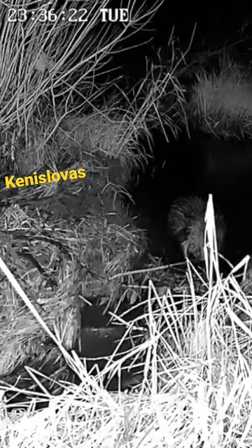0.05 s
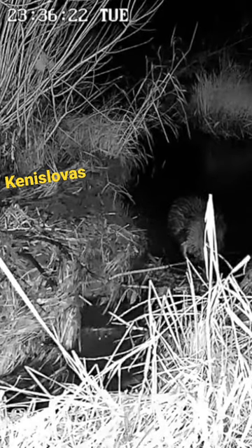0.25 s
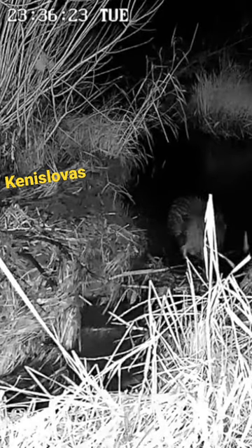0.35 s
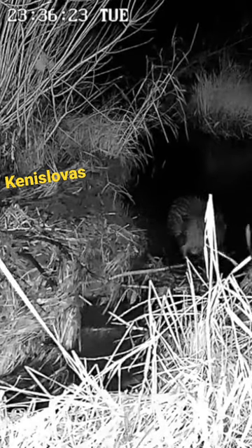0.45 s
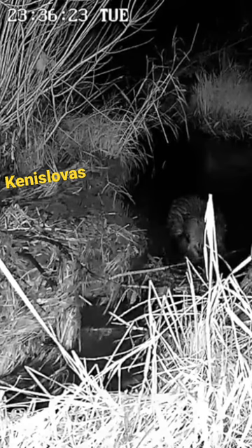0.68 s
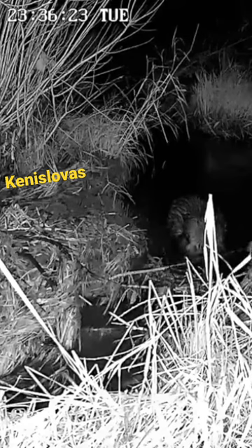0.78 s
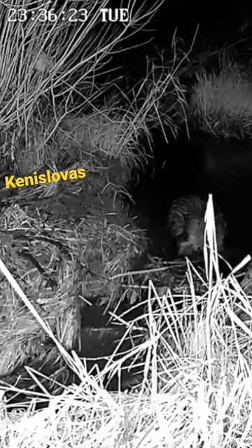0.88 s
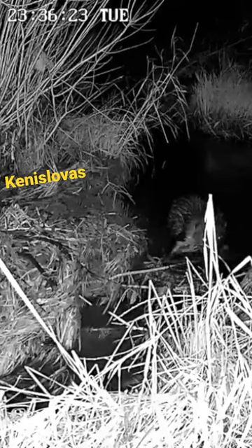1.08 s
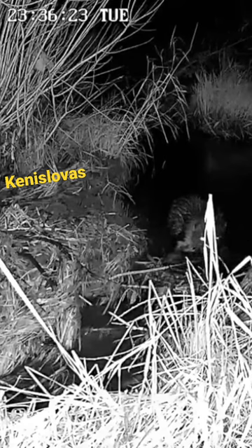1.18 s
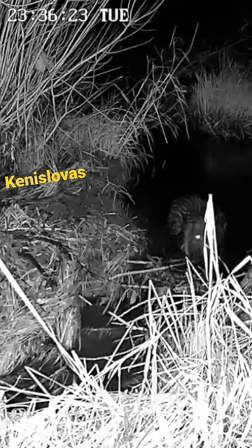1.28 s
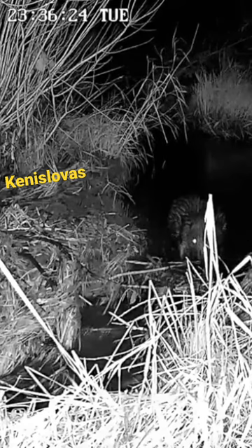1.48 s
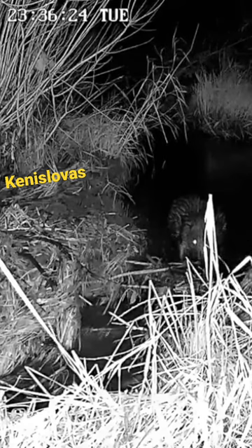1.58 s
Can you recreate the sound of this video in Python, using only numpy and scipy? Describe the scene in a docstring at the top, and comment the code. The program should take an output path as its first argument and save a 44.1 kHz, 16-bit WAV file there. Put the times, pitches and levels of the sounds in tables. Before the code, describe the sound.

A muffled, hollow wash of stream water with small plips runs throughout, heard through a trail camera's closed case. Deep soft thumps start at about 0.2 seconds, are strongest near 0.3 and 1 second, and mostly stop by 1.1. A low rumble throbs underneath. Faint hiss with a thin electronic whine appears at the start, briefly at 0.5, and from 1.3 seconds to the end, around 1.7.

```python
"""Water washes and plips: a stream at night, heard through the closed case of a trail camera on the bank.
The wash is shaped noise and each plip a briefly ringing bubble, coloured by the hollow of the case
near 800 Hz. Deep soft thumps and a slow throb rumble underneath; a faint, flickering hiss and the
camera's thin electronic whine lie on top."""
import sys
import numpy as np
from scipy import signal
from scipy.fft import rfft, irfft
from scipy.io import wavfile

SR = 44100
rng = np.random.default_rng(int(sys.argv[2]) if len(sys.argv) > 2 else 0)


def pcm_store(signal):
    """Save signal as 16-bit PCM."""
    levels = np.round(np.clip(np.atleast_2d(signal), -1, 1) * 32767)
    wavfile.write(sys.argv[1], SR, levels.astype(np.int16).T)


N = 72765

# Level of the hollow wash of water: time_s, level_db
HOLLOW_ENVELOPE = [(0, -50), (.15, -49.5), (.22, -55), (.33, -54.5), (.45, -51.5), (.9, -51), (1.15, -50.5),
                   (1.45, -50.5), (1.56, -45.5), (1.65, -49)]
# Level of the low wash, which drops out briefly during the biggest thumps: time_s, level_db
LOW_ENVELOPE = [(.14, -48), (.18, -54), (.2, -73.5), (.34, -77), (.39, -51.5), (.75, -50.5), (1.3, -51.5),
                (1.65, -51)]
# Levels of two brighter bands, which cut in and out: time_s, level_db
BRIM_ENVELOPE = [(0, -79), (.17, -67), (.21, -85.5), (.33, -82.5), (.37, -66.5), (.5, -57), (.68, -57.5),
                 (.72, -78.5), (.79, -73.5), (.82, -64), (.88, -56), (.91, -79), (.96, -61), (1.25, -59.5),
                 (1.65, -61)]
SWISH_ENVELOPE = [(0, -55.5), (.17, -50.5), (.21, -82.5), (.33, -87.5), (.38, -81), (.48, -82), (.5, -47),
                  (.55, -61), (.57, -64), (.68, -84), (.72, -93.5), (1.02, -104), (1.07, -64.5),
                  (1.12, -62), (1.165, -50), (1.23, -59.5), (1.3, -60.5), (1.34, -56), (1.65, -54)]
# Tone colour of these four bands: frequency_hz, relative_db
HOLLOW_SPECTRUM = [(350, -34.5), (570, -6), (700, 7.5), (810, 11.5), (950, 2), (1120, -3.5), (1230, -23),
                   (1500, -60), (2200, -75.5)]
LOW_SPECTRUM = [(60, -14.5), (170, 3.5), (250, 0.5), (450, 2), (600, 2.5), (800, -6.5), (1400, -57.5)]
BRIM_SPECTRUM = [(1000, -27.5), (1150, 0), (1330, -3.5), (1420, -12.5), (1520, -55)]
SWISH_SPECTRUM = [(700, 1), (1150, 1.5), (1330, 1), (1550, 1), (2000, -9), (2250, -30.5), (2700, -49)]


def wash(lapping_db=1.5):
    """The stream's hollow, lapping wash; beside it sound a low band and two brighter ones, which drop out at
    times."""
    hollow = level(HOLLOW_ENVELOPE) * noise(HOLLOW_SPECTRUM)
    lapping = amp(lapping_db * drift(rate_hz=37))
    brim = level(BRIM_ENVELOPE) * noise(BRIM_SPECTRUM)
    swish = level(SWISH_ENVELOPE) * noise(SWISH_SPECTRUM)
    low = level(LOW_ENVELOPE) * noise(LOW_SPECTRUM)
    return hollow * lapping + low + brim + swish


# Close plips, gliding by a share of their pitch per length:
# peak_s, level_db, pitch_hz, length_s, glide_share
NEAR_BUBBLES = [(.099, -32.5, 764, 0.0062, 0.056), (.184, -42.5, 784, 0.003, 0),
                (0.212, -40, 830, .005, -0.15), (.231, -35, 977, 0.0053, 0.046),
                (.240, -35.5, 765, 0.0049, -0.033), (0.267, -35, 908, 0.0061, 0.099),
                (0.276, -40.5, 800, 0.0052, -0.067), (0.283, -41, 852, .004, 0),
                (0.356, -44.5, 806, 0.0043, -0.17), (.378, -46.5, 797, 0.0043, -.05),
                (.540, -24, 763, 0.0046, 0.1), (.631, -32, 814, 0.0046, -0.018),
                (0.688, -30.5, 853, 0.0015, 0), (0.704, -35.5, 740, .006, -.04),
                (.749, -30, 793, .0055, .03), (0.785, -35, 867, 0.0029, 0),
                (.875, -41, 1090, 0.0076, 0.083), (0.969, -35.5, 950, 0.002, 0.03),
                (0.992, -34.5, 980, 0.0044, -0.0059), (1.061, -35.5, 851, 0.012, -0.024),
                (1.08, -34.5, 824, 0.011, -0.24), (1.161, -45, 1947, 0.0047, -0.091),
                (1.225, -36.5, 900, 0.0067, 0.18), (1.422, -37.5, 783, 0.0065, -0.11),
                (1.466, -42, 1070, 0.013, -0.077), (1.519, -34.5, 820, 0.0025, 0.11),
                (1.548, -33.5, 857, 0.01, .02), (1.571, -44, 940, 0.0062, -0.058),
                (1.579, -28, 800, 0.0016, 0), (1.611, -41.5, 770, 0.021, 0.15)]


def plips():
    """The nearest bubbles ring out one by one."""
    return sum(amp(db) * bubble(clock() - peak_s, hz, length_s, glide)
               for peak_s, db, hz, length_s, glide in NEAR_BUBBLES)


def bubble(t, hz, length_s, glide):
    """A bubble rings for a few cycles, sliding up or down in pitch."""
    cycles = hz * (t + glide * t ** 2 / (2 * length_s)) + rng.random()
    return swell(t, rise_s=.63 * length_s, fade_s=length_s) * np.sin(2 * np.pi * cycles)


def ripples(bubbles_per_s=190, level_db=-52.5, pitches=24, spread_db=2):
    """Many small bubbles of random pitch and strength, louder where the hollow wash swells."""
    t = np.arange(-SR // 50, SR // 50) / SR
    bubbles = np.zeros(N)
    for hz in np.geomspace(706, 1036, pitches):
        strengths = amp(spread_db * np.minimum(rng.exponential(1, N), 2))
        triggers = rng.random(N) < bubbles_per_s / pitches / SR
        ring = bubble(t, hz, length_s=.0059, glide=rng.uniform(-.12, .12))
        bubbles += signal.oaconvolve(strengths * triggers, ring, "same")
    return amp(level_db) * unit(bubbles * level(HOLLOW_ENVELOPE))


# Sub-bass hits: peak_s, level_db, pitch_hz, fade_s, knock_relative_db
DEEP_THUMPS = [(0.233, -10.5, 30.7, 0.031, -36), (0.264, -5.5, 37.9, 0.028, -42.5),
               (0.302, -4.5, 23.8, 0.034, -54), (.345, -13.5, 25.34, 0.05, -48.5),
               (0.409, -20, 45.8, 0.021, -20.5), (0.466, -16, 50.5, 0.022, -17),
               (0.609, -16, 33.3, 0.021, -27), (0.633, -25, 47, 0.0036, -27),
               (0.681, -15.5, 36.8, 0.033, -15), (0.738, -19.5, 70.3, 0.013, -1.5),
               (0.782, -16, 51.2, 0.014, -16), (0.812, -14.5, 36, 0.031, -20),
               (0.875, -14, 49.5, 0.042, -20), (0.978, -7, 39, 0.022, -9.5),
               (1.018, -13, 25.4, 0.06, -26.5), (1.075, -23.5, 52, 0.031, -28),
               (1.624, -30.5, 49, 0.045, -25)]


def thumps(rise_s=.008, knock_hz=98.7, knock_s=.0048):
    """Soft thumps: each is one or two deep swings, opening with a short, higher knock."""
    hits = np.zeros(N)
    for peak_s, db, hz, fade_s, knock_db in DEEP_THUMPS:
        t = clock() - peak_s
        body = swell(t, rise_s, fade_s) * np.sin(2 * np.pi * hz * t)
        knock = swell(t, knock_s, knock_s) * np.sin(2 * np.pi * knock_hz * t)
        hits += amp(db) * (body + amp(knock_db) * knock)
    return hits


# Tone colour of the tick: frequency_hz, relative_db
TICK_SPECTRUM = [(500, -11), (1500, -1.5), (3500, -12.5), (7000, -22)]


def tick(peak_s=.268, length_s=.0028, level_db=-58):
    """A tiny burst of noise tops one of the hardest thumps."""
    return amp(level_db) * swell(clock() - peak_s, length_s, length_s) * noise(TICK_SPECTRUM)


# Envelopes of the low bed: time_s, level_db
THROB_ENVELOPE = [(.1, -36.5), (.2, -25.5), (.36, -16.5), (.44, -26), (.6, -29), (.8, -28), (.94, -43),
                  (1.03, -28), (1.11, -21), (1.22, -20), (1.38, -25.5), (1.55, -26.5), (1.65, -31)]
CHURN_ENVELOPE = [(.16, -39), (.3, -24), (.46, -43), (.55, -32), (.66, -27.5), (.8, -21.5), (.89, -18.5),
                  (.945, -37.5), (1.01, -15.5), (1.1, -34), (1.3, -37), (1.45, -32.5)]
# Tone colour of the churn: frequency_hz, relative_db
CHURN_SPECTRUM = [(12, -13), (25, 11.5), (45, 4), (75, -5), (120, -15), (180, -30.5), (300, -38),
                  (700, -85.5)]


def rumble(throb_hz=22.5, wander_share=.09):
    """A very low, wavering tone throbs under churning noise."""
    pitch_hz = throb_hz * (1 + wander_share * drift(rate_hz=16))
    throb = unit(np.sin(2 * np.pi * np.cumsum(pitch_hz) / SR))
    return level(THROB_ENVELOPE) * throb + level(CHURN_ENVELOPE) * noise(CHURN_SPECTRUM)


# Spells of hiss: start_s, length_s, level_db
HISS_CUES = [(0, 0.11, -51.5), (0.112, 0.072, -58), (0.492, 0.067, -53.5), (1.319, .04, -57),
             (1.357, .11, -54.5), (1.467, .25, -55.5)]
# Tone colour of the hiss: frequency_hz, relative_db
HISS_SPECTRUM = [(1500, 2), (2200, 1), (3000, -0.5), (3650, -6), (4100, -1), (5500, -3), (7000, -6),
                 (7500, -5.5)]
# Partials of the whine, set against the hiss: pitch_hz, relative_db
WHINE_PARTIALS = [(3996, -17), (4394, -27), (5994, -22), (6393, -24), (6993, -17)]


def hiss():
    """Faint hiss comes and goes, with the camera's thin electronic whine in it."""
    gate = sum(amp(db) * spell(start_s, length_s, edge_s=.004) for start_s, length_s, db in HISS_CUES)
    whine = sum(amp(db) * unit(np.sin(2 * np.pi * hz * clock())) for hz, db in WHINE_PARTIALS)
    return gate * (noise(HISS_SPECTRUM) + whine)


# Wisps of treble: start_s, length_s, centre_hz, width_hz, level_db
FLICKER_CUES = [(0.354, 0.067, 1990, 203, -69), (0.353, 0.087, 5880, 491, -69.5),
                (0.417, 0.27, 4005, 260, -70), (0.425, 0.27, 6870, 613, -71.5),
                (0.567, 0.13, 1898, 257.3, -66), (0.603, 0.093, 4280, 489, -70),
                (0.607, 0.081, 5860, 526, -68), (0.932, 0.081, 6790, 557, -68),
                (1.066, 0.14, 6770, 560, -72), (1.25, 0.12, 3970, 280, -68),
                (1.255, 0.08, 6800, 560, -72.5)]


def flicker():
    """The treble flickers as narrow bands of hiss open and close."""
    return sum(amp(db) * spell(start_s, length_s, edge_s=.008) * band(centre_hz, width_hz)
               for start_s, length_s, centre_hz, width_hz, db in FLICKER_CUES)


def amp(db):
    """Decibels to gain."""
    return 10 ** (np.asarray(db) / 20)


def unit(x):
    """Scales to rms 1."""
    return x / np.sqrt(np.mean(x ** 2) + 1e-20)


def clock():
    """Time of every sample in seconds."""
    return np.arange(N) / SR


def level(envelope):
    """Gain over time from (time_s, level_db) points."""
    return amp(np.interp(clock(), *np.transpose(envelope)))


def swell(t, rise_s, fade_s):
    """A rounded rise to t = 0 and a rounded fall after it."""
    return np.exp(-(t / np.where(t < 0, rise_s, fade_s)) ** 2)


def spell(start_s, length_s, edge_s):
    """A gate that opens softly, holds and closes softly."""
    t = clock() - start_s
    return (np.tanh(t / edge_s) - np.tanh((t - length_s) / edge_s)) / 2


BINS_HZ = np.fft.rfftfreq(N, 1 / SR)


def shaped_noise(gain):
    """Noise of rms 1, weighted by one gain per frequency bin."""
    return unit(irfft(rfft(rng.standard_normal(N)) * gain, N))


def noise(spectrum):
    """Steady noise coloured by (frequency_hz, relative_db) points."""
    hz, db = np.transpose(spectrum)
    return shaped_noise(amp(np.interp(np.log(BINS_HZ + 1), np.log(hz), db)))


def drift(rate_hz):
    """Slow random wander, rolling off above rate_hz."""
    return shaped_noise(np.exp(-(BINS_HZ / rate_hz) ** 2))


def band(centre_hz, width_hz):
    """Noise in one narrow, steep-sided band."""
    offset = 2 * (BINS_HZ - centre_hz) / width_hz
    return shaped_noise(np.exp(-offset ** 6 / 2))


def scene():
    """Water, low end and faint treble meet at one microphone."""
    return (wash() + ripples() + plips() + thumps() + tick() + rumble() + flicker() + hiss())[None]


def record(dry, cutoff_hz=7450):
    """The camera's narrow bandwidth cuts off the top end."""
    lowpass = signal.firwin(601, cutoff_hz, window=("kaiser", 9), fs=SR)
    return signal.oaconvolve(dry, lowpass[None], "same")


dry = scene()
out = record(dry)
pcm_store(out)
```